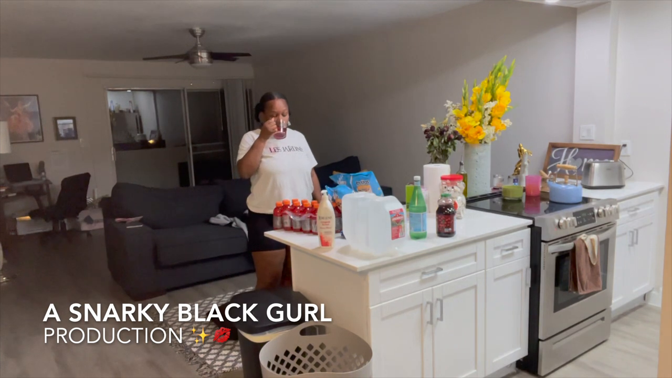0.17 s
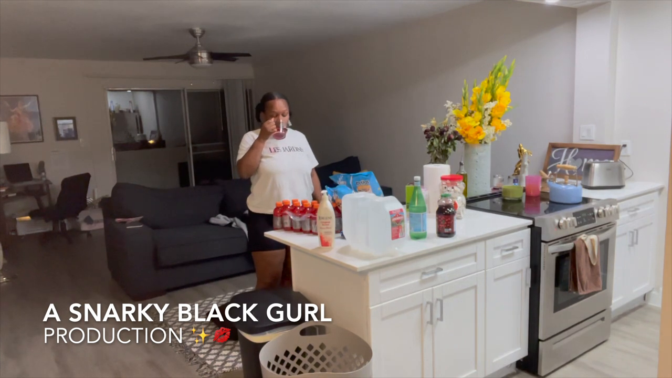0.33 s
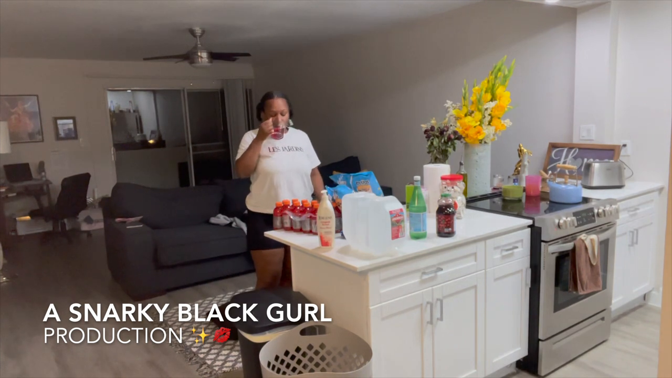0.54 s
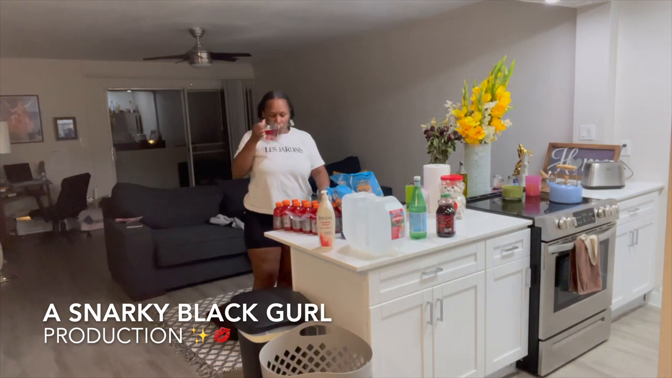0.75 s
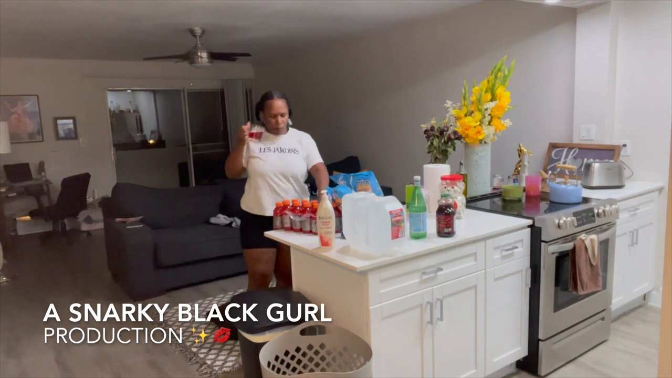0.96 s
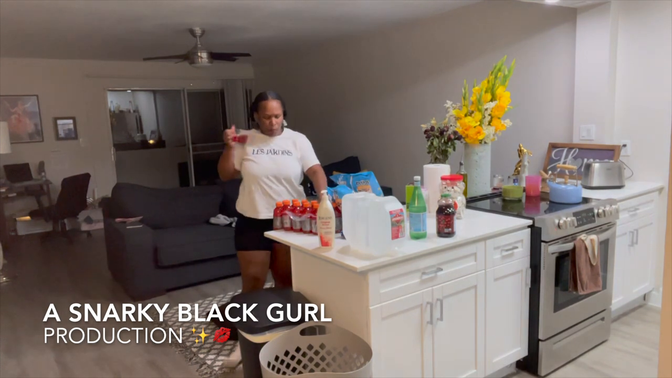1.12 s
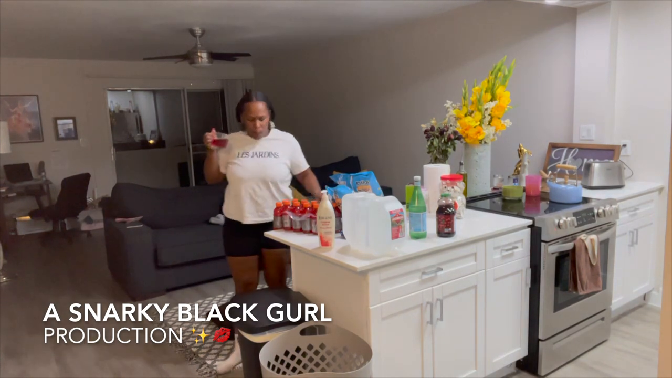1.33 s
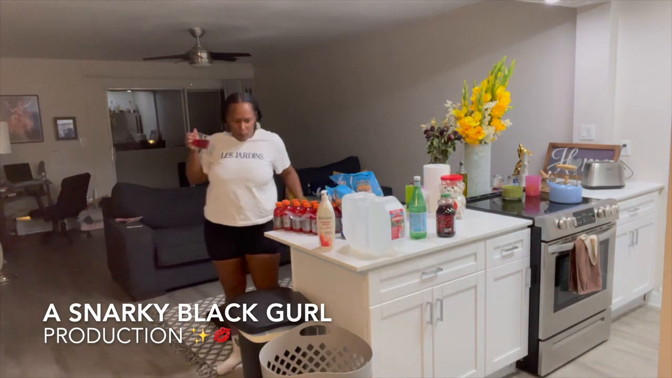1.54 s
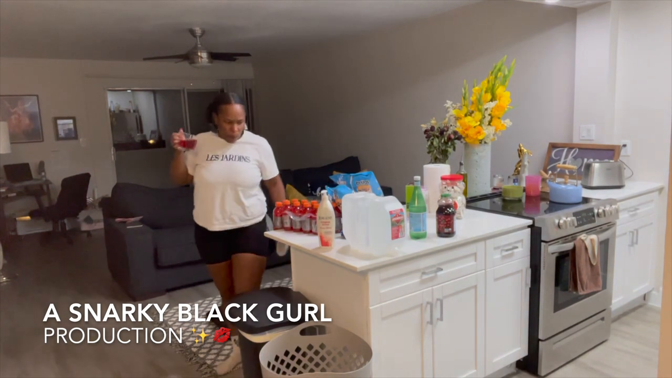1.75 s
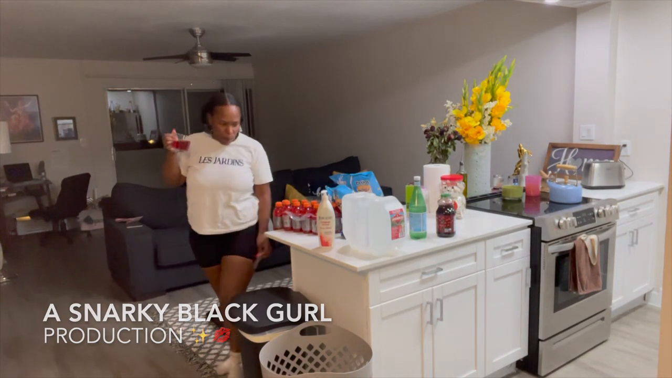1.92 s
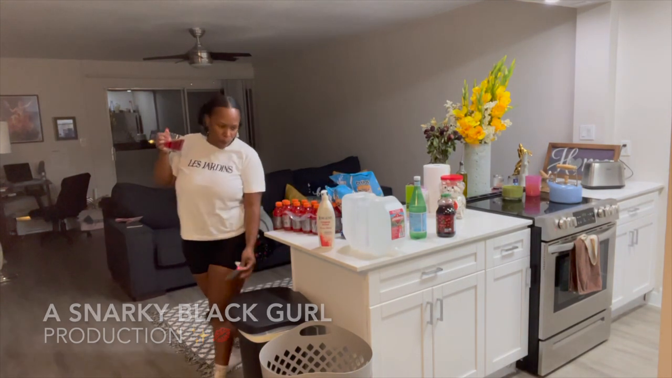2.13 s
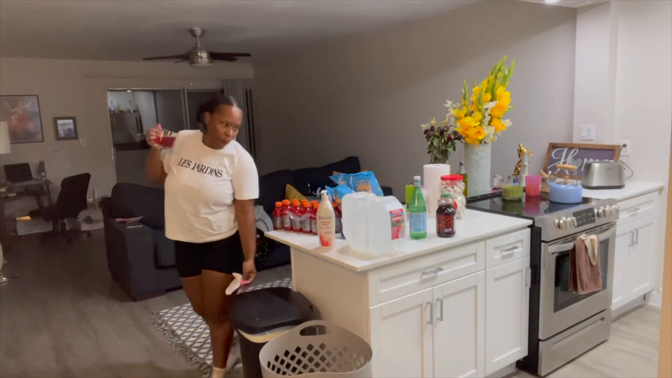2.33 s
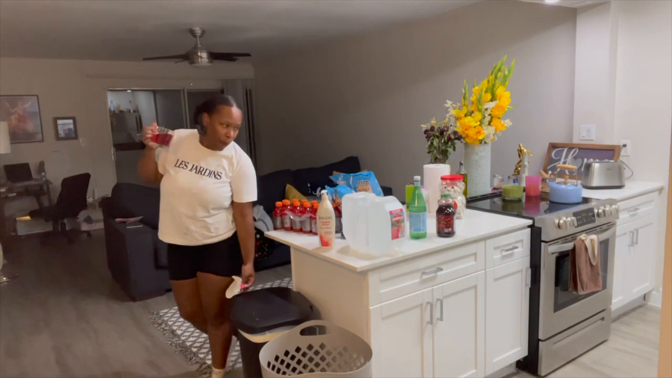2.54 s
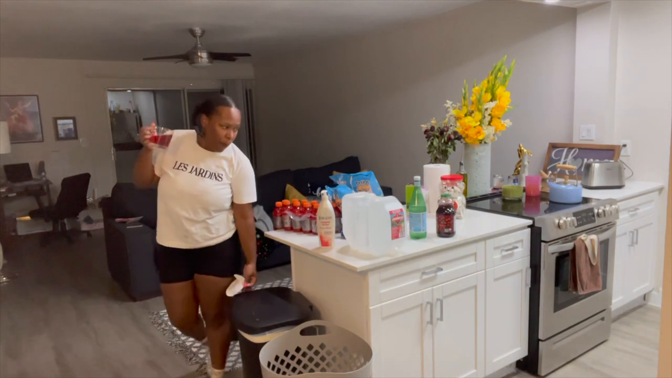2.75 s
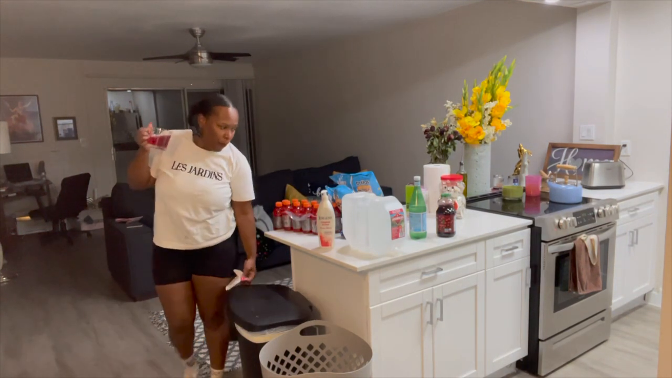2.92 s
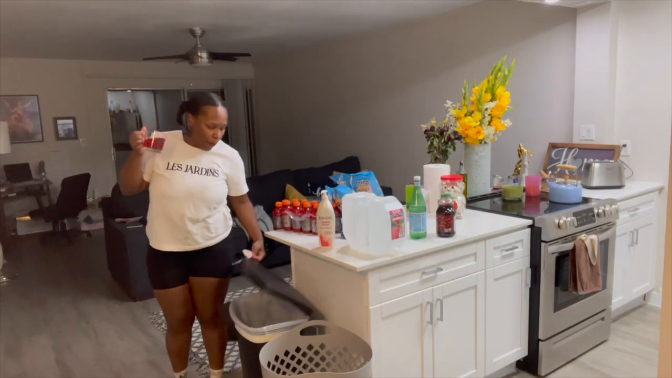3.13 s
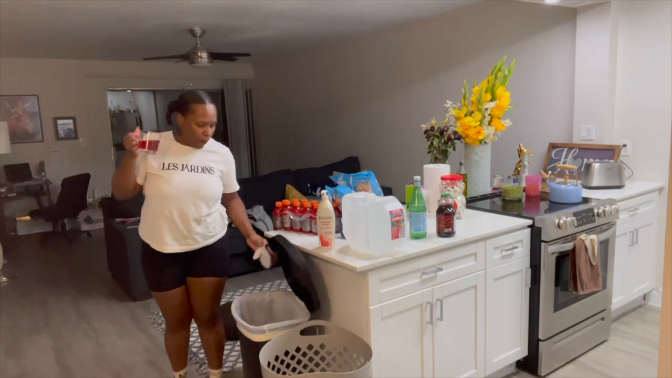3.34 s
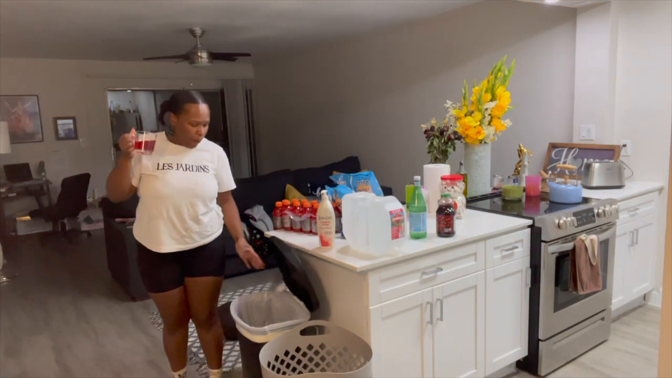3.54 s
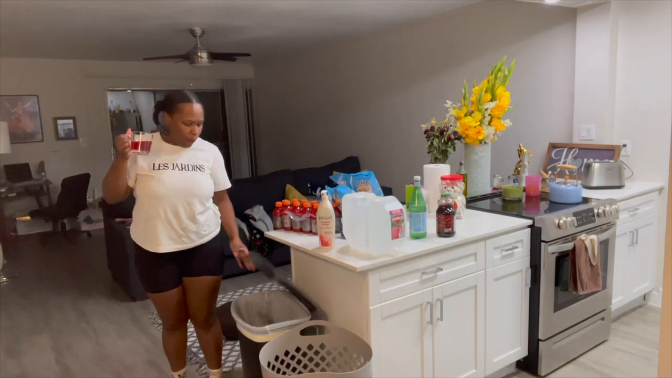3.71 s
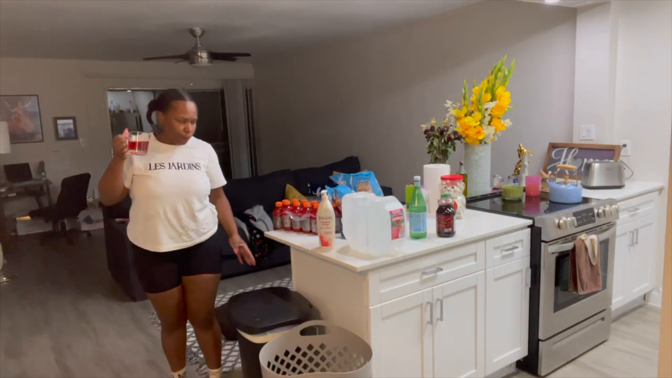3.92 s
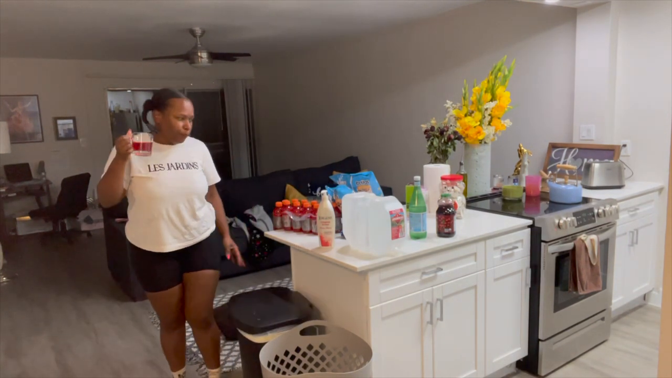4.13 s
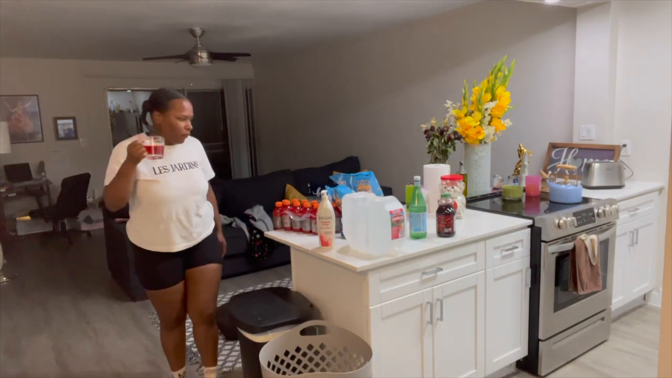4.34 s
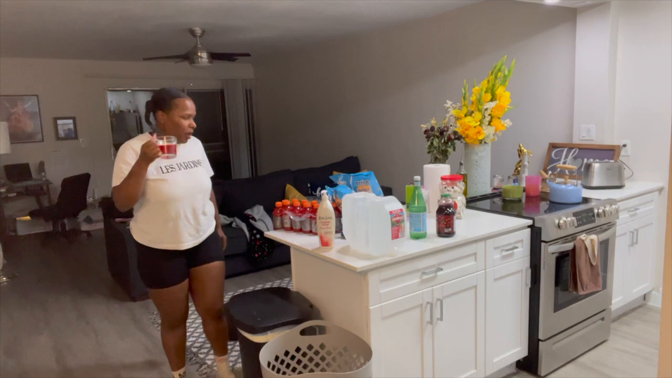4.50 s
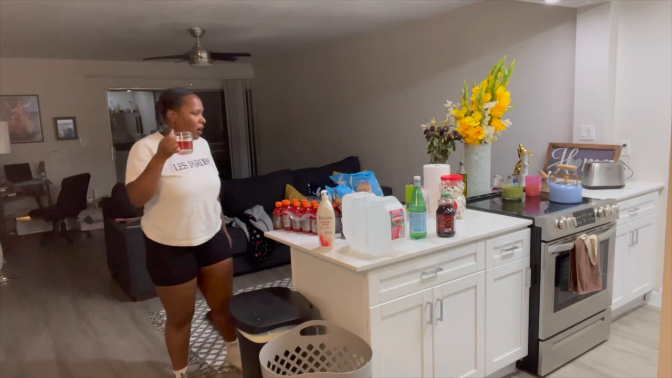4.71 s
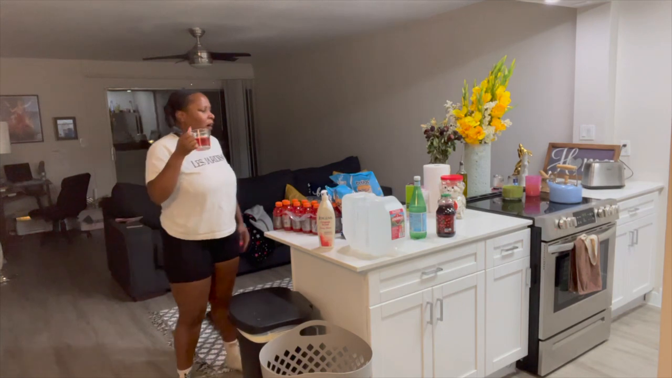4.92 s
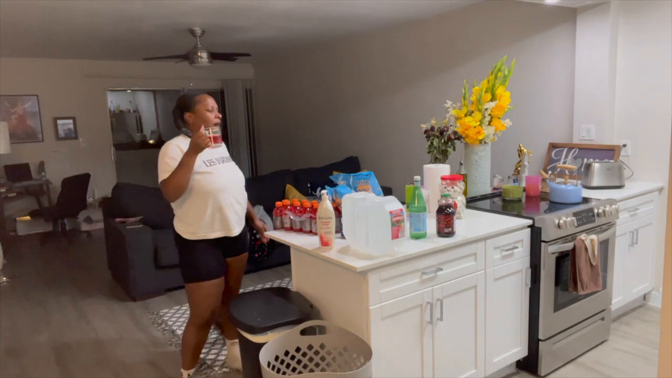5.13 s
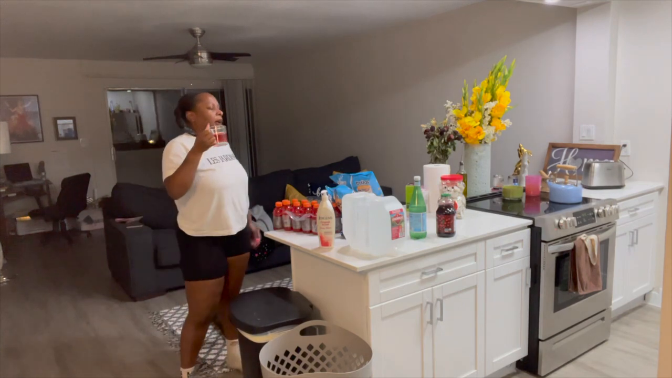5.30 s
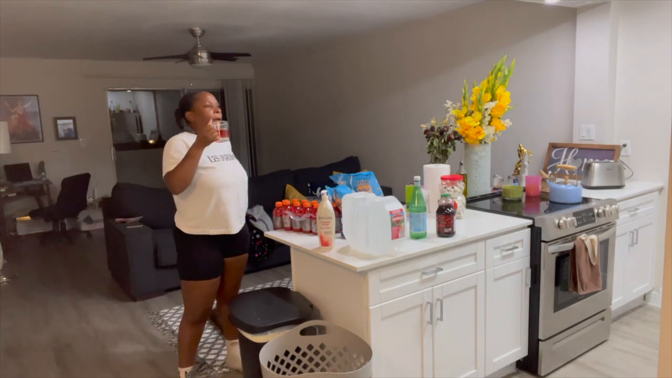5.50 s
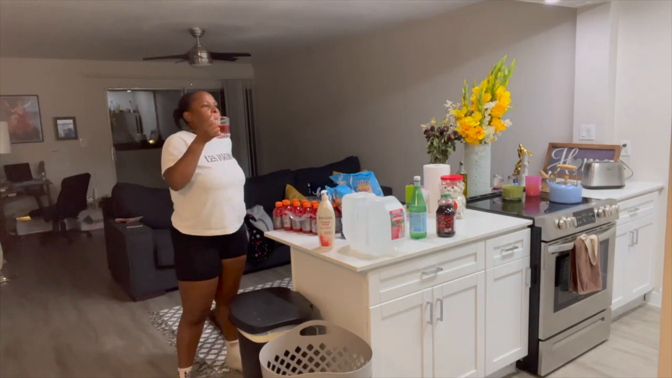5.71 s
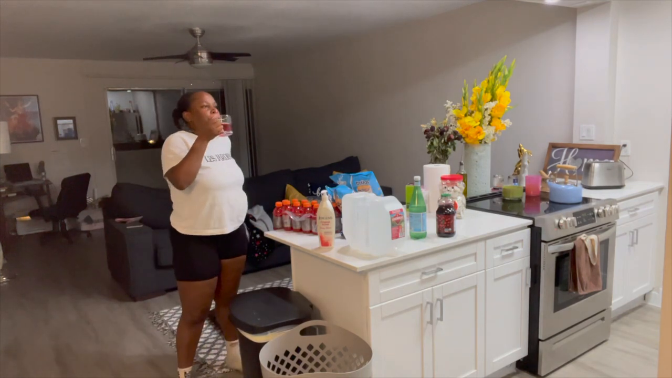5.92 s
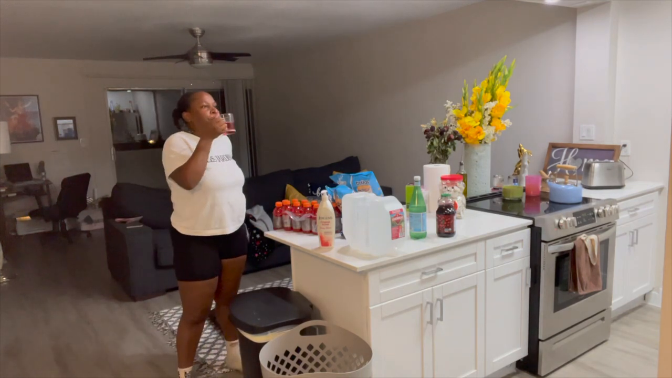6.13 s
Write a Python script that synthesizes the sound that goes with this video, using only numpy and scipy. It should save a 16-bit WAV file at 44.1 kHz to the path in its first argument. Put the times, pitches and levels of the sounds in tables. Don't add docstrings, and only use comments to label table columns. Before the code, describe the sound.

A low steady room hum, soft shuffling steps, then two loud hollow plastic knocks as a bin lid flips open and bangs closed.

```python
import sys
import numpy as np
from scipy import signal
from scipy.fft import rfft, irfft
from scipy.io import wavfile
from scipy.ndimage import uniform_filter1d

SR = 44100
rng = np.random.default_rng(int(sys.argv[2]) if len(sys.argv) > 2 else 0)


def wav_out(sig):
    wavfile.write(sys.argv[1], SR, np.round(np.clip(np.atleast_2d(sig).T, -1, 1) * 32767).astype(np.int16))


def boost_factor(decibels):
    exponent = np.asarray(decibels, float) / 20
    return 10 ** exponent


N = 271656

# [t/s, hum level/dB, motor level/dB]
HUM_LEVELS = [(0, -34.5, -47), (1.4, -34.5, -45), (1.5, -34.5, -60), (1.85, -34.5, -60), (2.0, -33, -60),
              (2.45, -33.5, -46), (3.3, -33.5, -45), (3.6, -38, -46), (5.3, -38.5, -45), (5.45, -36, -60),
              (6.05, -32.3, -60), (6.16, -33, -60)]
HUM_HZ, MOTOR_HZ = 119.9, 58.5

# [f/Hz, level/dB per Hz]
DEEP_SPECTRUM = [(20, -43), (35, -20), (48, 3), (58, 11), (70, 2.5), (90, 0.6), (115, 1.5), (150, -1.5),
                 (180, -59.5)]
# [f/Hz, level/dB per Hz]
DUCT_SPECTRUM = [(88, -20), (150, -1), (172, -4), (225, -16.5), (242, -16.5), (258, -0.5), (290, -9),
                 (377, -3), (409, -15.5), (576, -9.5), (666, -14.5), (723, -12), (749, -16), (813, -9.5),
                 (1300, -28.5), (1690, -39), (2860, -120)]
# [f/Hz, level/dB per Hz]
HISS_SPECTRUM = [(590, -21), (1000, -5), (1710, -5.5), (2620, -9.5), (3230, -13), (3500, -12.5),
                 (8160, -27.5), (9490, -25), (11800, -42), (12800, -43), (16000, -45)]
DEEP_DB, DUCT_DB, HISS_DB = -46, -44, -56.5
# [f/Hz, likeness/1]
EAR_LIKENESS = [(110, 1), (190, 0.93), (270, 0.17), (600, -0.024), (1200, -0.11), (3000, 0.049), (16000, 0)]

# [t/s, peak level/dB, f/Hz, t60/s, click over ring level/dB]
TICKS = [(.326, -50, 1220, .01, -15), (1.096, -42, 1700, .012, 0), (1.096, -46, 3200, .008, -11),
         (1.0955, -45, 5580, 0.015, -10), (1.103, -42, 5650, .07, -21), (1.947, -42, 2400, .015, -6),
         (1.989, -47, 1990, .008, -4), (2.035, -47, 2300, .008, 3), (2.909, -37, 1700, .006, -24),
         (3.259, -42, 4430, 0.015, -8), (3.333, -26, 2240, .015, -23), (3.3602, -9, 1400, 0.016, -25),
         (3.3605, -12, 2700, 0.011, -27), (3.366, -14, 1650, 0.012, -30), (3.651, -31, 1770, .012, -16),
         (3.9285, -14.5, 2390, .012, -24), (3.9322, -18.5, 4150, 0.0088, -24),
         (3.951, -13, 320, 0.068, -40), (4.455, -42.5, 6830, 0.0077, 2), (4.458, -34, 3150, .04, -8),
         (4.461, -36, 2700, 0.07, -15)]
# [f/Hz, level/dB per Hz]
SOLE_SPECTRUM = [(710, -25), (1200, -1), (2200, -3), (2900, -8.5), (6000, -10), (10900, -15.5),
                 (12500, -23), (14500, -16.5), (16000, -19)]
# [peak t/s, peak level/dB, 20 dB swell/s, 20 dB fade/s]
SCUFFS = [(1.094, -59, .008, .09), (1.2, -72, .15, .8), (1.59, -66, .05, .35), (1.88, -73, .04, .2),
          (2.0, -62, .17, .19), (2.664, -72, .16, .8), (2.882, -68, .04, .04), (3.024, -58, .17, .19),
          (3.26, -60, .1, .08), (3.592, -59.5, .03, .12), (3.79, -66, .08, .9), (3.42, -62, .05, .2),
          (3.915, -63, .1, .02), (4.26, -72, .3, .3), (4.456, -54, .006, .1), (4.73, -71, .03, .15)]
# [peak t/s, peak level/dB, 20 dB swell/s, 20 dB fade/s]
RUSTLES = [
    (1.99, -55, .12, .2),
    (3.895, -45, .04, .2),
    (5.7, -53, .3, .25),
]

# [share of drum pitch/1, level/dB, t60/s]
DRUM_MODES = [(.45, -17, 0.047), (.7, 0, 0.046), (1, 3.5, .07), (1.3, -8, 0.039)]
# [f/Hz, level/dB, t60/s]
PANEL_MODES = [(257, -7.5, .06), (320, 2, 0.041), (421, -13, 0.12), (486, -5, 0.073), (574, 5.5, 0.03),
               (673, -1.5, 0.042), (854, 6.5, 0.018), (1023, -4.5, 0.041)]
# [f/Hz, level/dB per Hz]
CRACK_SPECTRUM = [(700, -16), (1100, 4), (1500, -0.5), (1950, 1), (2500, -0.5), (3000, -12), (3600, -26.5),
                  (5000, -44)]
# [f/Hz, level/dB per Hz]
RIM_SPECTRUM = [(2800, -25), (3500, 1.5), (4200, -1), (5000, -7), (7000, -7.5), (8300, -16.5),
                (10500, -18.5), (16000, -31)]
# [t/s, drum peak level/dB, crack peak level/dB, drum f/Hz]
OPENING = [(2.76, -35, -54, 174), (2.80, -34, -46.5, 159.6), (3.339, -13, -25.5, 149),
           (3.376, -14.5, -26.5, 104), (3.392, -20.5, -31.5, 94.7), (3.424, -18.5, -36, 152),
           (3.4437, -15, -25, 152), (3.585, -24, -31.5, 94.2), (3.61, -26, -31, 178.5),
           (3.634, -21, -35.5, 155), (3.6534, -19, -33.5, 155), (3.729, -25.5, -50, 137),
           (3.808, -34, -39, 112)]
# [t/s, drum peak level/dB, crack peak level/dB, drum f/Hz]
CLOSING = [
    (3.884, -33.5, -41, 140.9),
    (3.9, -28.5, -40, 141),
    (3.9356, -15.5, -19, 105),
    (3.949, -10.5, -24, 150),
    (3.97, -19, -19, 114),
    (4.02, -15, -26, 135),
    (4.065, -30, -28, 157),
    (4.19, -38, -36, 151),
    (4.3, -40, -44.5, 151.8),
]
# [t/s, crack peak level/dB, then drum, panel and rim level over the crack/dB]
CLACKS = [
    (3.331, -27, -2, -1.5, -12),
    (3.360, -17, -28, -22, -4),
    (3.364, -12.5, -11, -1.5, -14),
    (3.9258, -19, -13, 5.5, -1),
    (3.929, -16, 3, 1.5, 0.6),
]
CLACK_HZ = 180
PANEL_OVER_DB = -0.8
RIM_OPEN_DB, RIM_SHUT_DB = -20, -12

# [f/Hz, t60/s]
ROOM_T60 = [(60, 0.27), (200, 0.46), (700, 0.59), (2000, 0.58), (5000, 0.47), (9000, 0.35), (16000, 0.16)]
# [f/Hz, level/dB]
ROOM_TAIL = [(60, 3.5), (300, 9), (2000, 3), (8000, 3)]
# [f/Hz, level/dB]
MID_RESPONSE = [(7600, 1), (8200, -3.5), (8600, -2.5), (9200, -0.5), (11500, 3), (12000, -20),
                (13400, -23.5), (13900, 2), (15600, -3), (16000, -27)]
# [f/Hz, level/dB]
SIDE_RESPONSE = [(9000, 1), (9500, -5), (11000, -4.5), (11600, 1.5), (13500, -1.5), (14600, -14),
                 (16000, -31.5)]
LOW_CUT_HZ = 38


def evened(x):
    return x / np.sqrt(np.mean(x ** 2) + 1e-20)


def read(points, hz):
    f, value = np.transpose(points)
    return np.interp(np.log(hz + 1), np.log(f + 1), value)


def add(mix, s, sound):
    part = mix[:, round(s * SR):][:, :sound.shape[-1]]
    part += sound[..., :part.shape[1]]


def paired(size):
    hz = np.fft.rfftfreq(size, 1 / SR)
    a, b, c, d = rng.standard_normal((N // (size // 4) + 5, len(hz), 4)).T
    same = np.clip(read(EAR_LIKENESS, hz), -1, 1)[:, None]
    left = a + 1j * b
    right = same * left + np.sqrt(1 - same ** 2) * (c + 1j * d)
    return hz, np.array([left, right])


def noise(spectrum, size, patchy_db):
    hz, z = paired(size)
    patches = uniform_filter1d(rng.standard_normal(z.shape[1:]), size=10, axis=0)
    patches = evened(uniform_filter1d(patches, size=8, axis=1))
    z = z * boost_factor(read(spectrum, hz)[:, None] + patchy_db * patches)
    return evened(signal.istft(z, nperseg=size, noverlap=3 * size // 4)[1][:, :N])


def hum():
    t = np.arange(N) / SR
    s, hum_db, motor_db = np.transpose(HUM_LEVELS)
    ear_db = np.array([[.2], [-.2]])
    mains = boost_factor(np.interp(t, s, hum_db) + ear_db) * np.sin(2 * np.pi * HUM_HZ * t)
    waver = 1.2 * np.sin(2 * np.pi * 1.3 * t)
    motor = boost_factor(np.interp(t, s, motor_db)) * np.sin(2 * np.pi * MOTOR_HZ * t + waver)
    return np.sqrt(2) * (mains + motor)


def air():
    deep = boost_factor(DEEP_DB) * noise(DEEP_SPECTRUM, size=4096, patchy_db=1.1)
    ducts = boost_factor(DUCT_DB) * noise(DUCT_SPECTRUM, size=2048, patchy_db=1.15)
    hiss = boost_factor(HISS_DB) * noise(HISS_SPECTRUM, size=1024, patchy_db=1.86)
    return deep + ducts + hiss


def ring(modes, chance, rise, room_db):
    t = np.arange(SR // 4) / SR
    out = 0
    for (hz, db, t60), c in zip(modes, chance):
        detuned_hz = hz * (1 + 0.057 * (c[0] - .5))
        phase = 0.64 * c[:, None]
        out = out + boost_factor(db - 60 * t / t60) * np.sin(2 * np.pi * (detuned_hz * t + phase / (2 * np.pi) * 2 * np.pi))
    out = out * (1 - np.exp(-t / rise))
    return out / abs(out).max() * boost_factor(np.array([[.8], [-.8], [room_db]]))


def snap(spectrum, white, rise, t60):
    size = white.shape[1]
    t = np.arange(size) / SR
    colour = boost_factor(read(spectrum, np.fft.rfftfreq(size, 1 / SR)))
    opposed = white - 0.14 * white[::-1]
    out = irfft(rfft(opposed) * colour) * (1 - np.exp(-t / rise)) * boost_factor(-60 * t / t60)
    out = out / abs(out).max()
    window = np.hanning(192)
    around = np.roll(irfft(colour), shift=len(window) // 2)[:len(window)] * window
    around = around / np.linalg.norm(around) * np.linalg.norm(out[0]) * boost_factor(-4.5)
    return np.vstack([out, np.pad(around, (0, size - len(window)))])


def ticks():
    out = np.zeros((3, N))
    chance = rng.random((len(TICKS), 3, 3))
    white = rng.standard_normal((len(TICKS), 2, 2048))
    for (s, db, hz, t60, click_db), c, w in zip(TICKS, chance, white):
        modes = [(hz, 0, t60), (hz * 1.07, -6, t60), (hz * .93, -3, t60)]
        add(out, s, boost_factor(db) * ring(modes, c, rise=0.00049, room_db=-5.0))
        add(out, s, boost_factor(db + click_db) * snap(SOLE_SPECTRUM, w, rise=.0003, t60=.012))
    return out


def stroke(s, db, swell, fade):
    t = np.arange(N) / SR - s
    return boost_factor(db - 20 * np.maximum(-t / swell, t / fade))


def scuffs():
    level = sum(stroke(*row) for row in SCUFFS)
    grain = boost_factor(1.5 * evened(uniform_filter1d(rng.standard_normal(N), size=200)))
    soles = noise(SOLE_SPECTRUM, size=256, patchy_db=1.5)
    return uniform_filter1d(level, size=400) * evened(grain) * soles * boost_factor(5.5)


def rustle():
    level = sum(stroke(*row) for row in RUSTLES)
    return level * noise(CRACK_SPECTRUM, size=256, patchy_db=2.5)


def blows():
    rows = [(*row, CLACK_HZ) for row in CLACKS]
    for table, rim_db in ((OPENING, RIM_OPEN_DB), (CLOSING, RIM_SHUT_DB)):
        for s, drum_db, crack_db, hz in table:
            over_db = drum_db - crack_db
            rows.append((s, crack_db, over_db, over_db / 2 + PANEL_OVER_DB, rim_db, hz))
    return sorted(rows)


def bin_lid():
    rows = blows()
    out = np.zeros((3, N))
    chance = rng.random((len(rows), 8, 3))
    white = rng.standard_normal((len(rows), 2, 2, 2048))
    for (s, db, drum_db, panel_db, rim_db, hz), c, w in zip(rows, chance, white):
        drum = [(hz * share, level_db, t60) for share, level_db, t60 in DRUM_MODES]
        steady = 0 * c
        add(out, s, boost_factor(db + drum_db) * ring(drum, steady, rise=0.0049, room_db=-5.5))
        add(out, s, boost_factor(db + panel_db) * ring(PANEL_MODES, c, rise=0.00068, room_db=0.0))
        add(out, s, boost_factor(db + 1.5) * snap(CRACK_SPECTRUM, w[0], rise=0.0013, t60=0.044))
        add(out, s, boost_factor(db + rim_db) * snap(RIM_SPECTRUM, w[1], rise=0.00037, t60=0.042))
    return out


def room(x):
    hz, z = paired(512)
    z = z[:, :, :400]
    t = np.arange(400) * 128 / SR
    t60 = read(ROOM_T60, hz)[:, None]
    z = z * boost_factor(-60 * t / t60) / np.sqrt(t60)
    z = z * boost_factor(read(ROOM_TAIL, hz)[:, None])
    tail = signal.istft(z, nperseg=512, noverlap=384)[1]
    tail = tail * (1 - np.exp(-np.arange(tail.shape[1]) / SR / .006))
    return signal.fftconvolve(x[None], tail / np.linalg.norm(tail[0]), axes=1)[:, :N]


def scene():
    hits = ticks() + bin_lid()
    direct, sent = hits[:2], hits[2]
    return hum() + air() + direct + scuffs() + rustle() + boost_factor(2.0) * room(sent)


def top_cut(x):
    return signal.sosfilt(signal.butter(12, 16490, fs=SR, output="sos"), x)


def record(dry):
    low_cut = signal.butter(4, LOW_CUT_HZ, "high", fs=SR, output="sos")
    dry = signal.sosfilt(low_cut, dry)
    taps = 1023
    hz = np.fft.rfftfreq(taps, 1 / SR)
    grid_hz = np.r_[hz[:-1], SR / 2]
    responses = (MID_RESPONSE, SIDE_RESPONSE)
    bands = np.array([signal.firwin2(taps, grid_hz, boost_factor(read(r, hz)), fs=SR) for r in responses])
    sum_and_difference = np.array([dry[0] + dry[1], dry[0] - dry[1]]) / 2
    mid, side = signal.oaconvolve(sum_and_difference, bands, "same", axes=1)
    return top_cut(np.array([mid + side, mid - side]))


dry = scene()
out = record(dry)
wav_out(out)
```